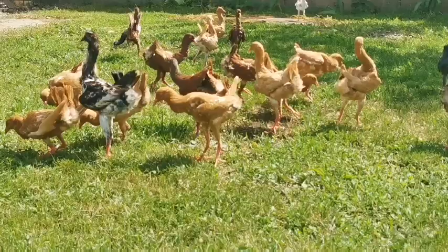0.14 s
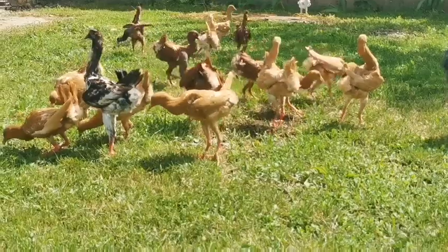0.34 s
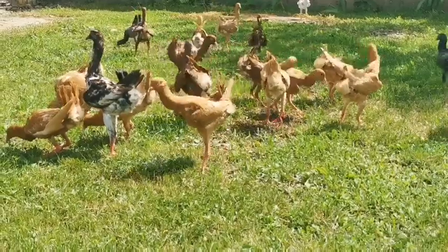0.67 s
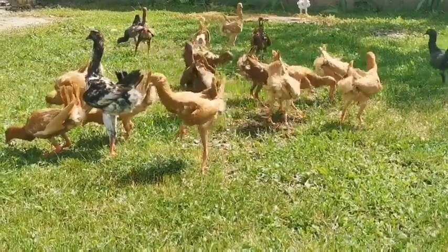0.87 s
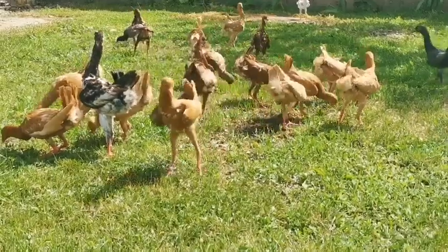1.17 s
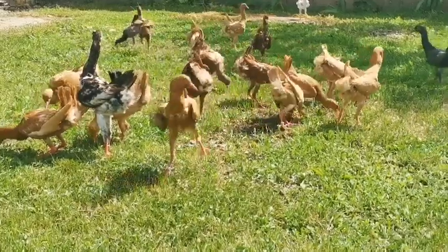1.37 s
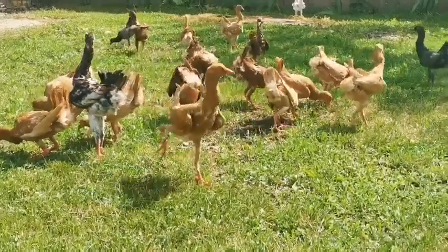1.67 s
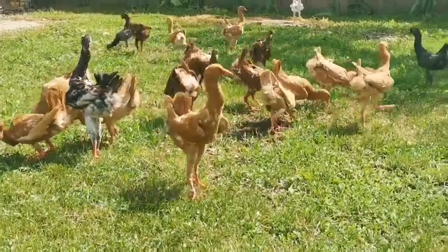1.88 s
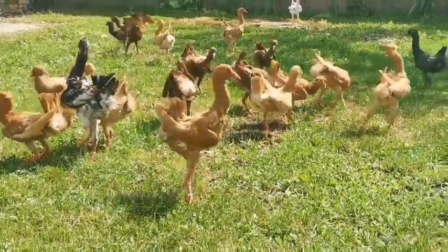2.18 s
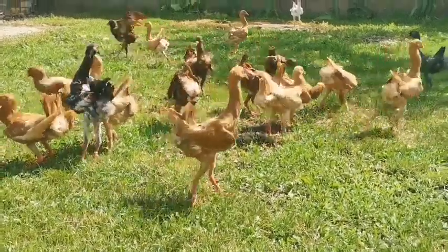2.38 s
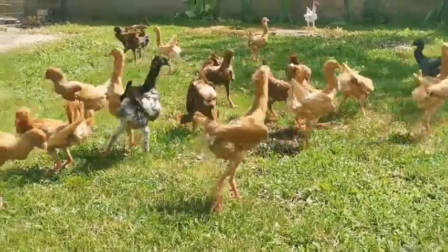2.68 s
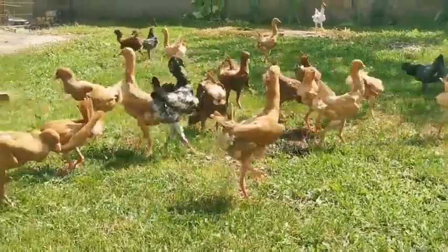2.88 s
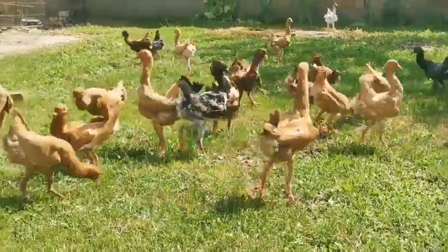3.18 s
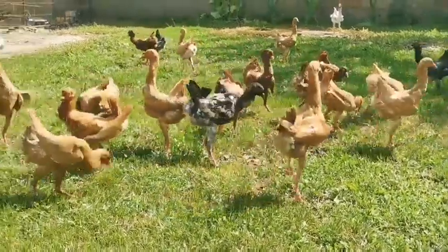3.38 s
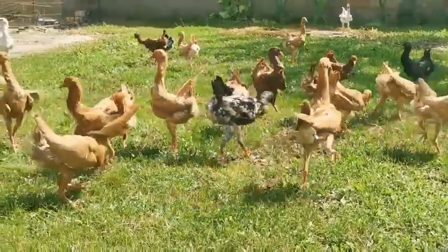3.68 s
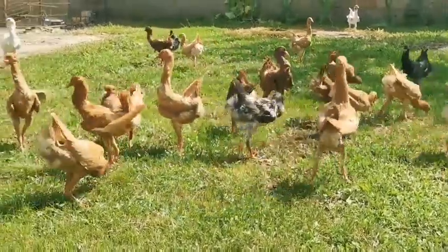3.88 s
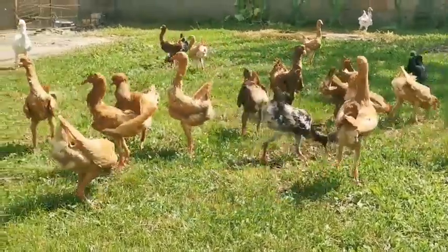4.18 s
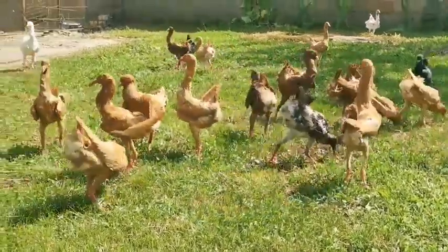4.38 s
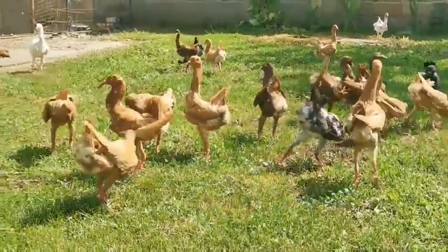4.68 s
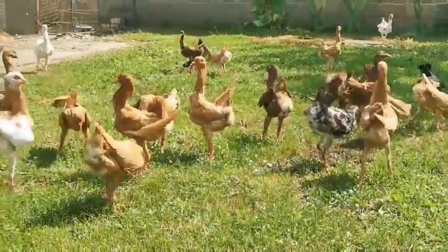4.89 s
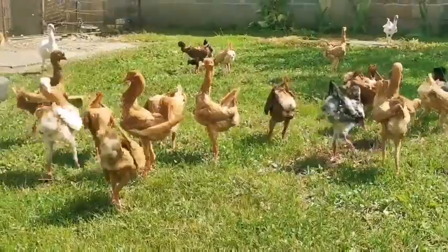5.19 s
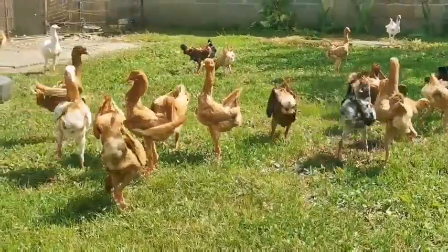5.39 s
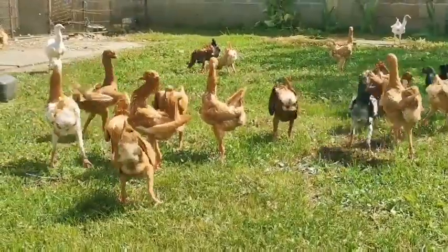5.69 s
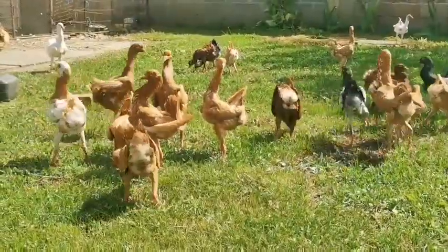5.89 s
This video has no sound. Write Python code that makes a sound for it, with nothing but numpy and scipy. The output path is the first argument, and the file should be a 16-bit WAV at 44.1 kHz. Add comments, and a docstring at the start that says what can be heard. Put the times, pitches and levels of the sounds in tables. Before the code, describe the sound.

A quiet sunny yard: a sparrow repeats a short raspy falling whistle about every three-quarters of a second, and chicks peep thinly far off. From one and a half seconds a hand shifts on the microphone, with dull thumps and rubbing, then a dense run of sharp snaps and scuffs until about four and a half. It calms, and a few soft low bird calls murmur near the end.

```python
"""A hand shifts on a microphone's case: the grip snaps, skin scuffs and rubs, fingers thump, cloth swishes.
Snaps and thumps strike damped modes; every rub is shaped noise made of tiny uneven slips.
Air rumbles on the two ports as low noise and single puffs.
Behind it a sparrow repeats a warbling whistle, and young chickens give thin far peeps
and a few soft low calls: gliding sines with a random tremble and a diffuse yard echo."""
import sys
import numpy as np
from scipy import signal
from scipy.fft import rfft, irfft, next_fast_len
from scipy.io import wavfile
from scipy.ndimage import uniform_filter1d, map_coordinates

SR = 44100
rng = np.random.default_rng(int(sys.argv[2]) if len(sys.argv) > 2 else 0)


def put_to_file(sound):
    """Save the sound as 16-bit audio at rate SR, in the file named by the first command-line argument."""
    columns = np.atleast_2d(sound).T  # one column per channel
    safe = np.clip(columns, -1, 1)
    whole_steps = np.round(safe * 32767)
    wavfile.write(sys.argv[1], SR, whole_steps.astype(np.int16))


N = 266805


def amp(db):
    """Decibels to gain."""
    return 10 ** (np.asarray(db) / 20)


def unit(x):
    """Scale to rms 1."""
    return x / np.sqrt(np.mean(x ** 2) + 1e-20)


def along(points, hz):
    """Interpolate (Hz, value) points on a log frequency axis."""
    f, v = np.transpose(points)
    return np.interp(np.log(hz + 1), np.log(f + 1), v)


def curves(rows):
    """One value per sample for each column after the time."""
    s, *cols = np.transpose(rows)
    return [np.interp(np.arange(N) / SR, s, c) for c in cols]


def wobble(rate_hz):
    """Smooth random curve with rate_hz knots a second."""
    knots = rng.standard_normal(N // 8)
    return map_coordinates(knots, [np.arange(N) * rate_hz / SR], mode="wrap")


def swell(s, half_s):
    """Rounded rise and fall about time s."""
    return np.exp(-np.abs((np.arange(N) / SR - s) / half_s) ** 3 / 2)


def gate(t, length_s, fade_s):
    """Attack, hold and release of one note."""
    return np.clip(np.minimum(t, length_s - t) / fade_s, 0, 1)


def filtered(x, response):
    """Multiply the spectrum of x by a response of frequency."""
    m = next_fast_len(x.shape[-1] + SR // 10)
    return irfft(rfft(x, m) * response(np.fft.rfftfreq(m, 1 / SR)), m)[..., :x.shape[-1]]


def add(track, s, sound):
    """Mix a sound in at time s."""
    part = track[..., max(round(s * SR), 0):][..., :sound.shape[-1]]
    part += sound[..., :part.shape[-1]]


def place(x, right_db, lead_ms):
    """Set the level difference of the two ports and the lead of the left one."""
    side = np.array([[1], [-1]])
    shifted = filtered(x, lambda hz: np.exp(side * 1j * np.pi * hz * lead_ms / 10 ** 3))
    return shifted * amp(-.5 * side * right_db)


def friction(colour, alike, spiky_db, patchy_db):
    """Stereo noise of rms 1 with uneven grains; its colour varies in random patches over frequency and time."""
    slips = rng.standard_normal((3, N)) * amp(spiky_db * np.clip(wobble(1500), -2, 2))
    share = np.clip(alike, 0, 1)
    ports = np.sqrt(share) * slips[0] + np.sqrt(1 - share) * slips[1:]
    z = signal.stft(ports, nperseg=512)[2]
    # the patches are the same on both ports
    field = uniform_filter1d(rng.standard_normal(z.shape[1:]), 6, 0)
    field = uniform_filter1d(field, 7, 1)
    patches = amp(patchy_db * np.clip(unit(field), -2, 2))
    pair = signal.istft(z * patches, nperseg=512)[1][:, :N]
    return unit(filtered(pair, lambda hz: amp(along(colour, hz))))


DETUNE_SHARE = .035  # random spread of each mode's pitch from blow to blow


def struck(modes, t):
    """Damped modes; each mode's pitch is randomly detuned a little at every blow."""
    sound = 0
    for hz, db, t60_s in modes:
        mode_hz = hz * (1 + DETUNE_SHARE * rng.standard_normal())
        sound = sound + amp(db - 60 * t / t60_s) * np.sin(2 * np.pi * mode_hz * t)
    return sound


def glide(t, length_s, pitches_hz, rough, rough_rate_hz):
    """Pure voice of rms 1 that arcs through evenly spaced pitches, with a random tremble."""
    arc = np.polyfit(np.linspace(0, 1, len(pitches_hz)), pitches_hz, len(pitches_hz) - 1)
    tremble = 1 + rough * wobble(rough_rate_hz)[:len(t)]
    pitch_hz = np.polyval(arc, np.clip(t / length_s, 0, 1)) * tremble
    return np.sqrt(2) * np.sin(2 * np.pi * np.cumsum(pitch_hz) / SR)


# yard decay: freq_hz, t60_s
YARD_DECAY = [(200, 0.19), (3000, 0.68), (8000, 0.67)]


def yard(x):
    """Diffuse answer of walls and trees: decaying noise, different in each ear."""
    hz, t, z = signal.stft(rng.standard_normal((2, SR // 2)), SR, nperseg=256)
    decay = amp(-60 * t / along(YARD_DECAY, hz)[:, None])
    tail = signal.istft(z * decay, SR, nperseg=256)[1]
    return signal.fftconvolve(x[None], tail / np.linalg.norm(tail[0]), axes=1)


# air flow on the ports: time_s, level_db
BUFFET = [(0.0, -56), (0.65, -70.5), (1.92, -89), (2.31, -62), (2.7, -44.5), (3.2, -49), (4.85, -52.5),
          (5.3, -58), (6.05, -59.5)]
# single puffs: middle_s, half_length_s, level_db, pitch_hz
PUFFS = [(0.261, 0.012, -39.5, 59), (0.911, 0.025, -54.5, 38.2), (2.621, 0.062, -43, 54.8),
         (5.784, 0.018, -41, 61.5)]
# spectrum of the air lumps: freq_hz, gain_db
RUMBLE_COLOUR = [(30, 1.5), (70, 2), (120, -7.5), (200, -17.5), (500, -40.5)]
# spectrum of the quiet garden: freq_hz, gain_db
GARDEN_COLOUR = [(60, 3.5), (140, -12), (210, -55), (500, -9.5), (1000, -40), (2350, -20), (6500, -14.5),
                 (8200, -21.5), (11300, -14.5), (16000, -31)]
BUFFET_DB = 4  # added to the flow level


def air():
    """Quiet garden noise, lumps of moving air on each port, and puffs that push the ports unevenly."""
    flow = amp(curves(BUFFET)[0] + BUFFET_DB + 0.57 * wobble(5.72))
    lumps = flow * friction(RUMBLE_COLOUR, alike=0.31, spiky_db=1.8, patchy_db=2.0)
    t = np.arange(N) / SR
    puffs = np.zeros((2, N))
    for s, half_s, db, hz in PUFFS:
        phase = rng.standard_normal((2, 1))  # one per port
        puffs += amp(db) * swell(s, half_s) * np.sin(2 * np.pi * hz * (t - s) + phase)
    garden = amp(-67.0 + wobble(1.9)) * friction(GARDEN_COLOUR, alike=0.21, spiky_db=1, patchy_db=3)
    return lumps + np.sqrt(2) * place(puffs, right_db=-8.5, lead_ms=0) + garden


# far peeps: start_s, level_db
PEEPS = [(.859, -56), (1.533, -60.5), (2.269, -65), (5.218, -65), (5.95, -63.5)]
# notes of one peep: after_s, length_s, first_hz, last_hz, level_db
PHRASE = [(0, 0.0767, 5610, 5555, 1.5), (0.093, 0.0412, 4144, 4860, 0.5)]


def chicks():
    """Thin two-note peep, falling then rising, heard only by its echo from across the lawn."""
    out, t = np.zeros((2, N)), np.arange(SR // 5) / SR
    for s, db in PEEPS:
        for after_s, length_s, first_hz, last_hz, note_db in PHRASE:
            note = glide(t, length_s, [first_hz, last_hz], rough=.06, rough_rate_hz=900)
            note = note * gate(t, length_s, fade_s=.004)
            add(out, s + after_s, amp(db + note_db) * yard(note))
    return out


# low calls: start_s, length_s, first_hz, middle_hz, last_hz, level_db, hoarseness_0_to_1, right_db
LOW_CALLS = [(5.369, 0.045, 250, 244, 276, -57, 0.96, -1), (5.393, 0.11, 443, 440, 406, -56.5, 0.67, 7),
             (5.474, 0.058, 482, 525, 505, -63, 0.1, 8), (5.532, 0.057, 449, 442, 425, -50.5, 0.8, 6),
             (5.565, 0.163, 473, 413, 386, -53.5, 0.06, 5), (5.732, 0.2, 318, 235, 270, -47.5, 0.37, -3),
             (5.785, 0.14, 434, 464, 420, -49.5, 0.2, 8.5)]


def low_calls():
    """Soft closed-beak notes that overlap; each arcs in pitch, and the hoarse ones flutter."""
    voice, t = np.zeros((2, N)), np.arange(SR // 4) / SR
    for s, length_s, first_hz, middle_hz, last_hz, db, hoarse, right_db in LOW_CALLS:
        pitches_hz = [first_hz, middle_hz, last_hz]
        note = glide(t, length_s, pitches_hz, rough=.08 * hoarse, rough_rate_hz=220)
        flutter = 1 + hoarse * wobble(130)[:len(t)]
        note = amp(db) * gate(t, length_s, fade_s=0.011) * flutter * note
        add(voice, s, place(note, right_db, lead_ms=0.31))
    return voice + amp(-8.5) * yard(voice.mean(axis=0))[:, :N]


# whistle of one chirp: after_s, pitch_hz, level_db
CHIRP = [(.002, 3750, -5), (.009, 4300, -4.5), (.02, 4200, 2), (.03, 3800, -2), (.042, 3480, -6),
         (.058, 3300, -2.5), (.069, 3680, -3), (.081, 3750, 3), (.09, 3320, 2), (.098, 2950, 0.5),
         (.112, 2980, 2.5), (.123, 2940, -3.5), (.131, 2750, -16)]
# chirps: start_s, level_db
CHIRPS = [(0.223, -52), (1.132, -48.5), (1.779, -51), (2.522, -48.5), (3.27, -49), (3.974, -49),
          (4.695, -49.5), (5.354, -49)]
WARBLE_FROM_S, WARBLE_RATE_HZ, WARBLE_DEPTH_HZ = .095, 83.2, 227


def sparrow():
    """Raspy falling whistle that ends in a fast warble, answered by near walls and the yard."""
    out, t = np.zeros((2, N)), np.arange(SR // 6) / SR
    after_s, pitch_hz, level_db = np.transpose(CHIRP)
    since_s = np.maximum(t - WARBLE_FROM_S, 0)
    warble_hz = WARBLE_DEPTH_HZ * np.sin(2 * np.pi * WARBLE_RATE_HZ * since_s)
    pitch = np.interp(t, after_s, pitch_hz) - warble_hz
    shape = amp(np.interp(t, after_s, level_db)) * gate(t, after_s[-1], fade_s=0.0019)
    for s, db in CHIRPS:
        tremble = 1 + .027 * wobble(700)[:len(t)]
        rasp = amp(2.8 * wobble(300)[:len(t)])
        whistle = np.sqrt(2) * np.sin(2 * np.pi * np.cumsum(pitch * tremble) / SR)
        note = amp(db) * shape * rasp * whistle
        # near walls: 60 ms t60, silent for the first 4 ms
        walls = rng.standard_normal((2, len(t))) * amp(-60 * t / 0.06) * (t > .004)
        echo = signal.fftconvolve(note[None], walls / np.linalg.norm(walls[0]), axes=1)
        add(out, s, amp(-3.3) * note)
        add(out, s, amp(-10) * echo)
        add(out, s, amp(-3.5) * yard(note))
    return place(out, right_db=1.0, lead_ms=0.349)


# cloth swishes: middle_s, half_length_s, mid_db, top_db, case_hum_db
SWISHES = [(0.946, 0.071, -85, -60, -96), (1.114, 0.029, -58.5, -72, -71), (1.402, 0.043, -53, -53, -55),
           (1.49, 0.029, -50, -62, -50), (1.891, 0.06, -52, -80, -46.5), (2.992, 0.034, -41.5, -66, -68),
           (3.386, 0.097, -50, -57, -50), (3.803, 0.024, -51, -50.5, -57), (4.138, 0.047, -51, -66, -62),
           (4.951, 0.035, -60, -62, -68), (5.391, 0.018, -74, -59.5, -86)]
# airy top, also of the snaps: freq_hz, gain_db
TOP_COLOUR = [(6500, 1), (8500, 11), (10500, 13.5), (14000, 13.5), (16500, -7)]


def swishes():
    """Cloth brushes past in soft airy swells and makes the case hum."""
    mid, top, hum = np.zeros((3, N))
    for s, half_s, mid_db, top_db, hum_db in SWISHES:
        shape = swell(s, half_s)
        mid += amp(mid_db) * shape
        top += amp(top_db) * shape
        hum += amp(hum_db) * shape
    cloth = mid * friction(SCUFF_COLOUR, alike=.2, spiky_db=2, patchy_db=3)
    cloth += top * friction(TOP_COLOUR, alike=.2, spiky_db=2.5, patchy_db=2)
    body = hum * friction(CASE_COLOUR, alike=1, spiky_db=3, patchy_db=1)
    return place(cloth, right_db=4.5, lead_ms=0.423) + place(body, right_db=3.5, lead_ms=0.1)


# steady contact: time_s, hum_drag_db, rub_drag_db
GRIP = [(0.0, -61.5, -62), (0.39, -64.5, -70.5), (0.59, -66, -62), (1.05, -67.5, -71), (1.51, -56.5, -60),
        (1.97, -53, -50.5), (2.24, -56.5, -61), (2.6, -52.5, -54), (3.02, -50, -47.5), (3.22, -53, -50),
        (3.4, -48, -46.5), (4.13, -50.5, -49), (4.53, -50.5, -50.5), (4.66, -63, -57.5), (5.15, -60.5, -69),
        (5.59, -61, -61.5), (5.8, -60, -64.5), (6.05, -64, -73)]
# hum of the case, also under cloth: freq_hz, gain_db
CASE_COLOUR = [(70, -6), (150, -1.5), (250, 0), (380, -5), (550, -14), (730, -12.5), (1000, -15.5),
               (1400, -13.5), (2500, -88)]
# grain of the rub: freq_hz, gain_db
RUB_COLOUR = [(400, -27), (700, -2), (1000, -7.5), (1400, -4.5), (2250, 1.5), (3400, -9), (4800, -6),
              (6600, -3.5), (7900, -18), (10000, -11.5), (13500, -15.5), (16500, -36)]
FIRM_DB = -50  # drag at which hum and rub have the levels below
HUM_DB, HUM_DB_PER_DB, RUB_DB, RUB_DB_PER_DB = -48, 1.534, -51, 1.0
STICK_DB, STICK_S = 2.5, 0.012  # dip while the skin sticks, and its lead on each contact


def rubbing():
    """Skin drags in uneven pulls: a hollow hum and a grainy rub, both dipping before each contact."""
    hum_drag_db, rub_drag_db = np.array(curves(GRIP)) - FIRM_DB
    contacts_s = [row[0] for table in (SNAPS, SCUFFS, THUMPS) for row in table]
    stuck = np.max([swell(s - STICK_S, STICK_S / 2) for s in contacts_s], axis=0)
    pull = wobble(45)
    hum_db = HUM_DB + HUM_DB_PER_DB * hum_drag_db - STICK_DB * stuck + 2.1 * pull
    hum = amp(hum_db) * friction(CASE_COLOUR, alike=1.0, spiky_db=2.5, patchy_db=2.5)
    chatter_db = 2.2 * wobble(130)
    rub_db = RUB_DB + RUB_DB_PER_DB * rub_drag_db - STICK_DB * stuck + 0.59 * pull + chatter_db
    rub = amp(rub_db) * friction(RUB_COLOUR, alike=.43, spiky_db=2.8, patchy_db=3.5)
    return place(hum, right_db=1.4, lead_ms=0.33) + place(rub, right_db=6.5, lead_ms=0.44)


# finger blows: start_s, level_db, first_pitch_hz, ring_t60_s, hard_contact_db
THUMPS = [(1.5092, -28.5, 363, 0.046, -27), (1.83, -36, 225.4, 0.061, -35.5),
          (1.884, -26.5, 236, 0.055, -33), (2.003, -22.5, 322, 0.039, -35), (2.272, -28.5, 301, 0.072, -46),
          (2.721, -26, 358, 0.036, -33.5), (2.75, -26, 298, 0.046, -34.5),
          (3.369, -29.5, 207.7, 0.039, -24.5), (3.495, -31, 270, 0.093, -29),
          (3.558, -32.5, 246, 0.048, -35), (3.653, -35.5, 264, 0.032, -35), (3.803, -39, 277, 0.086, -34),
          (3.881, -31, 273.4, 0.072, -38), (4.065, -37, 331, 0.094, -28), (4.304, -32.5, 356, 0.048, -34.5),
          (4.612, -36, 328, 0.061, -40.5), (5.454, -39, 308, 0.066, -72), (5.542, -39.5, 312, 0.061, -62),
          (5.708, -32, 309, 0.056, -50)]
# shudder of the case: freq_hz, gain_db
THUMP_COLOUR = [(60, -18.5), (150, -3.5), (250, 7), (380, 0), (560, -16.5), (2200, -46)]
# low-mid knock, also of snaps and scuffs: freq_hz, gain_db
KNOCK_COLOUR = [(100, -14), (350, 9), (750, 10.5), (980, 5.5), (1400, 9), (2400, 4), (3300, -15),
                (6000, -24)]
# deeper case modes, also of snaps: freq_hz, level_db, t60_s
KNOCK_RING = [(779, -6.5, 0.025), (1317, -14.5, 0.054)]
SAG_SHARE, SAG_S = 0.36, 0.033  # pitch drop and its time constant as the finger eases off
SHUDDER_LASTS = 2.88  # shudder t60 over ring t60
CONTACT_T60_S = 0.062


def thumps():
    """Soft blows of the fingers knock on the case, ring it briefly and set it shuddering."""
    ring, shudder, contact, modes = np.zeros((4, N))
    t = np.arange(SR // 4) / SR
    rise = 1 - np.exp(-(t / 0.0029) ** 2)
    sag = 1 - SAG_SHARE * (1 - np.exp(-t / SAG_S))
    for s, db, hz, t60_s, contact_db in THUMPS:
        tone = np.sin(2 * np.pi * np.cumsum(hz * sag) / SR)
        add(ring, s, rise * amp(db - 60 * t / t60_s) * tone)
        add(shudder, s, rise * amp(db - 60 * t / (SHUDDER_LASTS * t60_s)))
        add(contact, s, rise * amp(contact_db - 60 * t / CONTACT_T60_S))
        add(modes, s + 0.001554, amp(contact_db + 5.5) * rise * struck(KNOCK_RING, t))
    shaking = shudder * friction(THUMP_COLOUR, alike=0.95, spiky_db=0.5, patchy_db=1.5)
    body = amp(2.0) * ring + amp(-7.5) * shaking
    hard = contact * friction(KNOCK_COLOUR, alike=1.0, spiky_db=6.5, patchy_db=-2.5)
    knock = modes + amp(-6.0) * hard
    return place(body, right_db=0.5, lead_ms=0.27) + place(knock, right_db=2.5, lead_ms=0.23)


# skin slides: start_s, decay_s, scrape_db, low_mid_db, rasp_db
SCUFFS = [(.541, 0.061, -43, -54.5, -45.5), (1.514, .011, -45, -39, -60), (1.9923, 0.051, -38, -35, -59),
          (2.652, 0.019, -35.5, -38, -60), (2.869, 0.0097, -31.5, -55, -30.5),
          (2.936, 0.0074, -18.5, -28, -45), (3.052, 0.012, -32, -55, -40),
          (3.097, 0.024, -24.5, -30.5, -42), (3.157, 0.027, -34.5, -55, -54),
          (3.202, 0.02, -36.5, -63, -44), (3.275, 0.016, -20.5, -28, -30),
          (3.364, 0.023, -27.5, -29, -40.5), (3.425, 0.011, -30, -33, -59), (3.505, 0.022, -43, -37, -38),
          (3.641, 0.022, -37, -33.5, -44), (3.8739, 0.01, -30, -30, -45), (3.97, 0.01, -32.5, -35, -46),
          (4.2305, 0.012, -32.5, -41, -43), (4.3605, 0.014, -24.5, -26.5, -44),
          (4.392, .011, -32, -40, -55), (4.436, 0.015, -32.5, -44, -46), (4.971, 0.021, -43, -45, -73)]
# scrape, also of cloth: freq_hz, gain_db
SCUFF_COLOUR = [(200, -47), (900, -15), (2300, 6.5), (3500, -1), (5000, -1), (6800, 4), (7800, -7),
                (10000, -2.5), (14500, -10.5), (16500, -31)]
# bright rasp: freq_hz, gain_db
RASP_COLOUR = [(1200, -24), (2100, 3.5), (3400, -14), (4900, 0), (6600, 5.5), (7800, -12.5), (12000, -31)]
SCUFF_RISE_S = 0.0018  # a slide gathers speed


def scuffs():
    """Slides of the skin, often just after a snap: a quick swell of dense slips that dies away."""
    high, low, bright = np.zeros((3, N))
    t = np.arange(SR // 5) / SR
    onset = 1 - np.exp(-t / SCUFF_RISE_S)
    for s, decay_s, db, low_db, bright_db in SCUFFS:
        shape = onset * np.exp(-(t / decay_s) ** 2)
        add(high, s, amp(db) * shape)
        add(low, s, amp(low_db) * shape)
        add(bright, s, amp(bright_db) * shape)
    sound = amp(-7) * high * friction(SCUFF_COLOUR, alike=0.15, spiky_db=4.5, patchy_db=4)
    sound += bright * friction(RASP_COLOUR, alike=0.4, spiky_db=3, patchy_db=3.5)
    sound += amp(-8.5) * low * friction(KNOCK_COLOUR, alike=0.72, spiky_db=-2.0, patchy_db=5.5)
    return place(sound, right_db=4.0, lead_ms=0.23)


# grip snaps: start_s, level_db, top_db, crackle_db
SNAPS = [(2.0221, -15.5, -31, -36), (2.79, -9, -9, -29), (2.8657, -23, -17, -43),
         (2.9193, -11.5, -11.5, -22), (3.035, -6, -14, -21), (3.0827, -8, -14, -33),
         (3.1461, -16, -14, -26), (3.2631, -2.5, -16, -23), (3.622, -4, -11.5, -25.5),
         (3.749, -8.5, -8.5, -31), (4.0034, -5.5, -18, -25.5), (4.0238, -18, -30, -28.5),
         (4.4678, -10.5, -15, -27), (4.4873, -24, -32, -27)]
# bright case modes: freq_hz, level_db, t60_s
SNAP_RING = [(300, -22, 0.033), (2050, -20, 0.011), (4935, -12, 0.0092), (6580, -8.5, 0.0083)]
# crackle: freq_hz, gain_db
SNAP_COLOUR = [(500, -51), (1500, -10.5), (2500, 15), (3600, -2.5), (4800, 5), (6600, -3), (9000, -12)]
PING_DB, SNAP_KNOCK_DB = -7, -28  # bright ring and low-mid knock, relative to the snap's level


def snaps():
    """The grip lets go in about a millisecond and pings the case, with a short crackle."""
    ping, mid, low, top = np.zeros((4, N))
    t = np.arange(SR // 10) / SR
    crack = np.exp(-((t - .0014) / .0005) ** 2)
    crackle = (1 - np.exp(-t / 0.0008)) * amp(-60 * t / 0.022)
    for s, db, top_db, crackle_db in SNAPS:
        add(ping, s + 0.001005, amp(db + PING_DB) * struck(SNAP_RING, t))
        add(ping, s + 0.001005, amp(db + SNAP_KNOCK_DB) * struck(KNOCK_RING, t))
        add(mid, s, amp(crackle_db) * crackle)
        add(low, s, amp(db + SNAP_KNOCK_DB) * crackle)
        add(top, s, amp(top_db) * (crack + amp(11.5) * crackle))
    body = mid * friction(SNAP_COLOUR, alike=.5, spiky_db=2, patchy_db=3.5)
    knock = low * friction(KNOCK_COLOUR, alike=.5, spiky_db=1.5, patchy_db=3.5)
    fizz = amp(-29.5) * top * friction(TOP_COLOUR, alike=.15, spiky_db=2, patchy_db=3.5)
    return place(ping + body + knock, right_db=2.5, lead_ms=0.19) + place(fizz, right_db=4.5, lead_ms=0.15)


def scene():
    """Birds out on the lawn, handling at the microphone."""
    birds = chicks() + low_calls() + sparrow()
    handling = swishes() + rubbing() + thumps() + scuffs() + snaps()
    return air() + birds + handling


TOP_HZ = 16300


def record(dry):
    """Steep low-pass: almost nothing passes above the band limit."""
    return filtered(dry, lambda hz: 1 / (1 + (hz / TOP_HZ) ** 120))


dry = scene()
out = record(dry)
put_to_file(out)
```